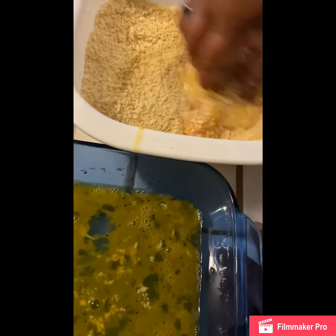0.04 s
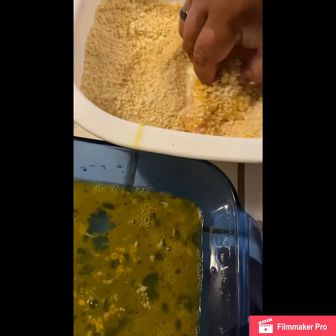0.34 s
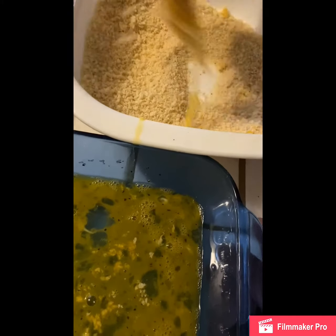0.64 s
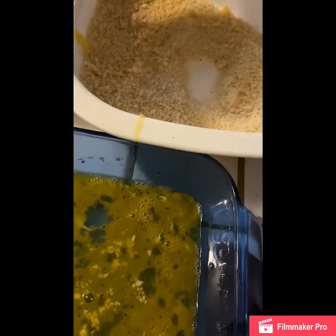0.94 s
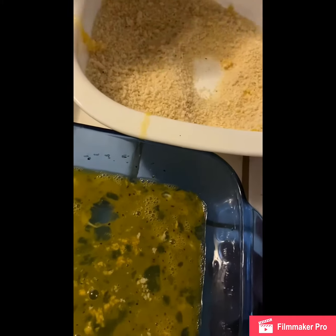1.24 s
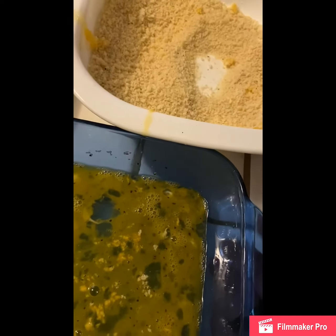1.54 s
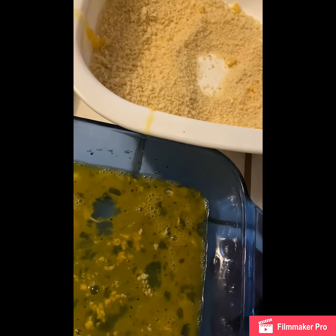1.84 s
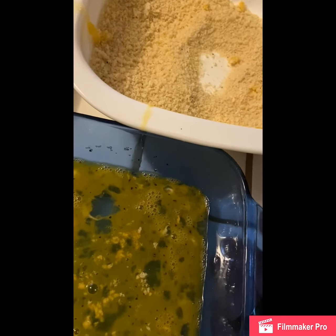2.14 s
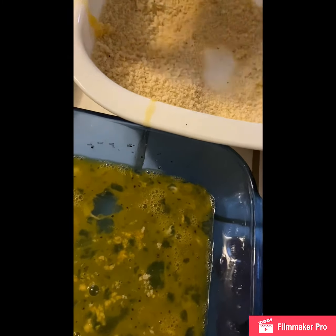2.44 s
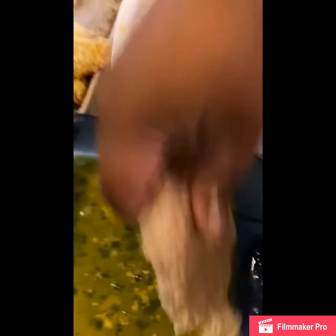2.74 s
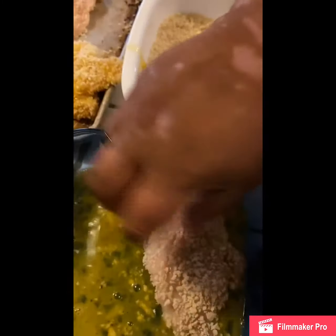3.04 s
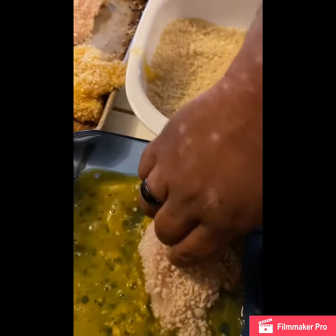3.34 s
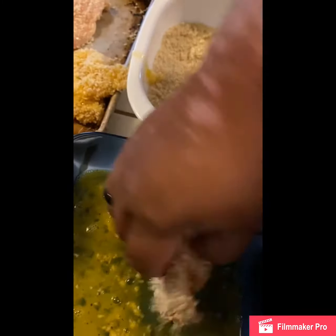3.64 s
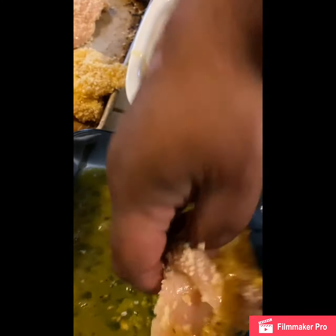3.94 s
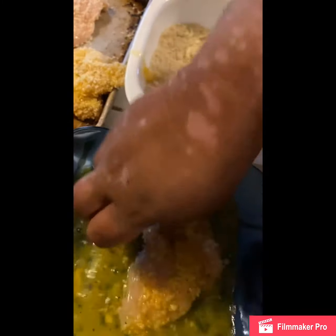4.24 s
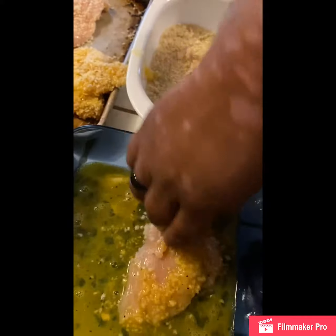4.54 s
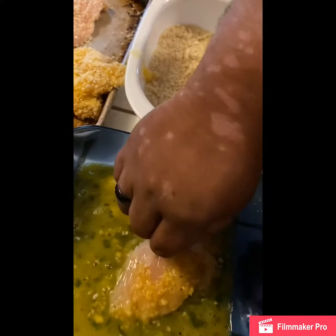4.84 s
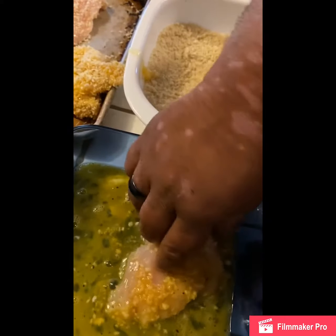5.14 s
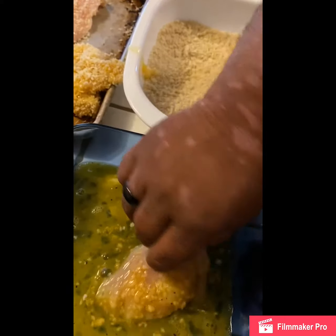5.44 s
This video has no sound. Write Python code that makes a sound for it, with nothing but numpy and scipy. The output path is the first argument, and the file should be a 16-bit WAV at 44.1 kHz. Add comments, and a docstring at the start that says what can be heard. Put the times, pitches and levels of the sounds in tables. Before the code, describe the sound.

Fingers rustle a raw cutlet through dry breadcrumbs, then slap it into beaten egg as the glass dish knocks on a tiled counter.

```python
"""A raw chicken cutlet is breaded by hand on a tiled kitchen counter, close to a phone.
Fingers press it into rustling dry crumbs in a plastic tub and flop it over with a wet slap,
then turn it in a glass dish of beaten egg, where tiny bubbles fizz and trapped air gulps out.
Each push tips the dish: it knocks on the tiles, chatters back and makes the counter hum briefly."""
import sys
import numpy as np
from scipy import signal
from scipy.fft import rfft, irfft, next_fast_len
from scipy.io import wavfile
from scipy.ndimage import map_coordinates

SR = 44100
rng = np.random.default_rng(int(sys.argv[2]) if len(sys.argv) > 2 else 0)


def file_out(sig):
    """Save sig as 16-bit WAV at sys.argv[1]."""
    # one column per channel
    cols = np.atleast_2d(sig).T
    # limit, then scale
    lim = np.clip(cols, -1, 1)
    pcm = np.round(lim * 32767).astype(np.int16)
    wavfile.write(sys.argv[1], SR, pcm)


N = 250047


def amp(db):
    """Turn decibels into a gain."""
    return 10 ** (np.asarray(db) / 20)


def unit(x):
    """Scale a sound to an average (rms) level of 1."""
    return x / np.sqrt(np.mean(x ** 2) + 1e-20)


def along(points, hz):
    """Read between (Hz, value) points on a log frequency scale."""
    freqs, values = np.transpose(points)
    return np.interp(np.log(hz + 1), np.log(freqs + 1), values)


def fade(t, fade_s):
    """A gain that dies away. All fade and rise times here span 60 dB."""
    return amp(-60 * t / fade_s)


def swell(start, hold_s, rise_s, fade_s):
    """A gain that rises to 1 by the start time, holds, then fades."""
    t = np.arange(N) / SR - start
    return fade(np.maximum(-t, 0), rise_s) * fade(np.maximum(t - hold_s, 0), fade_s)


def swells(rows, rise_s, fade_s):
    """Join several swells into one gain."""
    return np.linalg.norm([amp(db) * swell(s, hold, rise_s, fade_s) for s, hold, db in rows], axis=0)


def wobble(per_s):
    """A smooth curve through per_s random values a second."""
    return map_coordinates(rng.standard_normal(N // 20), [np.arange(N) * per_s / SR], mode="mirror")


def grains(per_s, spread_db):
    """Tiny random clicks of uneven size."""
    sizes = amp(spread_db * np.clip(rng.standard_normal(N), -2, 2)) * rng.choice([-1, 1], N)
    return unit(sizes * (rng.random(N) < per_s / SR))


def filtered(x, response):
    """Change each frequency's level and phase by response(hz)."""
    n = x.shape[-1]
    size = next_fast_len(n + 8192)
    return irfft(rfft(x, size) * response(np.fft.rfftfreq(size, 1 / SR)), size)[..., :n]


def coloured(x, tone):
    """Shape a sound with a (Hz, dB) table, without smearing it earlier in time."""
    size = 4096
    cepstrum = irfft(np.log(amp(along(tone, np.fft.rfftfreq(size, 1 / SR)))))
    cepstrum[1:size // 2] *= 2
    cepstrum[size // 2 + 1:] = 0
    return signal.fftconvolve(x, irfft(np.exp(rfft(cepstrum))))[:len(x)]


def add(track, start, sound, peak_db):
    """Mix a sound in at the given time and peak level."""
    part = track[max(round(start * SR), 0):][:len(sound)]
    part += (amp(peak_db) * sound / np.abs(sound).max())[:len(part)]


def softened(x, corner_hz):
    """A softer contact loses more treble."""
    return filtered(x, lambda hz: 1 / (1 + 1j * hz / corner_hz * np.sqrt(2) - (hz / corner_hz) ** 2))


def struck(blows, notes, crack_db):
    """Each blow cracks and rings an object's own notes; the shifting load detunes them a little."""
    out, t = np.zeros(N), np.arange(SR // 5) / SR
    for start, db, hardness_hz in blows:
        detune = 1 + 0.029 * rng.standard_normal(len(notes))
        ring = np.zeros(len(t))
        for k, (hz, note_db, fade_s) in enumerate(notes):
            level = amp(note_db + rng.normal(0, 1)) * fade(t, fade_s)
            ring += (-1) ** k * level * np.sin(2 * np.pi * hz * detune[k] * t)
        crack = amp(crack_db) * rng.standard_normal(len(t)) * fade(t, .015)
        onset = 1 - np.exp(-t / 0.000093)
        add(out, start, softened((ring + crack) * onset, hardness_hz), db)
    return out


# Level of the background noise, which dips briefly twice as the phone turns it down.
# Each row: time in seconds, relative level in dB.
NOISE_LEVELS = [(0, -63), (.4, -67), (1.1, -57), (1.4, -67.5), (1.6, -52), (2.3, -56), (3.1, -61),
                (3.65, -52), (3.9, -64), (4.2, -59), (5.67, -57.5)]
# Its tone. Each row, as in every _TONE table: frequency in Hz, relative level in dB.
NOISE_TONE = [(20, -28), (40, 2.5), (65, 0.5), (140, -2.5), (270, 0.5), (420, -12), (700, -14), (1200, -18),
              (2200, -22), (2750, -23), (3500, -28.5), (5000, -35), (16000, -42)]
def kitchen():
    """Low room noise, nearly the same at the phone's two microphones."""
    times, levels_db = np.transpose(NOISE_LEVELS)
    level = amp(np.interp(np.arange(N) / SR, times, levels_db) - 1.5)
    shared, apart = (unit(coloured(rng.standard_normal(N), NOISE_TONE)) for _ in range(2))
    return level * (shared + amp(-18) * apart * np.array([[1], [-1]]))


# The kitchen's echo. Each row: frequency in Hz, fade time in seconds.
ECHO_FADES = [(150, 0.36), (1000, 0.37), (4000, 0.13), (12000, 0.032)]
def room_echo(x):
    """The kitchen rings briefly; the two close microphones hear its bass alike, its treble apart."""
    hz, t, spectra = signal.stft(rng.standard_normal((2, SR // 2)), SR, nperseg=256)
    spectra *= fade(t, along(ECHO_FADES, hz)[:, None])
    spectra[1] *= np.clip(hz / 1400, 0, 1)[:, None]
    mid, side = signal.istft(spectra, SR, nperseg=256)[1]
    tail = np.array([mid + side, mid - side]) / np.linalg.norm(mid)
    return signal.fftconvolve(np.pad(x, (200, 0))[None], tail, axes=1)[:, :N]


# Echoes off the tub and dish walls. Each row: delay in seconds, left gain, right gain.
WALL_ECHOES = [(.00062, 0.034, 0.065), (.00112, 0.025, -0.12), (.0018, -0.072, 0.03), (.0029, 0.069, 0.007),
               (.0043, .05, .2), (.0066, 0.16, 0.072)]
def near_walls(x):
    """Near walls add faint, quick copies of the sound, different on each side."""
    return filtered(x, lambda hz: 1 + sum(np.outer([left, right], np.exp(-2j * np.pi * hz * delay))
                                          for delay, left, right in WALL_ECHOES))


# The hand leaning. Each row: start in seconds, hold in seconds, level in dB.
LEANS = [(2.14, 0.058, -51.5), (3.49, 0.013, -49.5), (4.57, 0.29, -54), (4.9, 0.046, -61),
         (5.15, 0.015, -46)]
RUMBLE_TONE = [(25, -19.5), (55, -5.5), (80, 1), (130, -10.5), (250, -41), (600, -74.5)]
def counter_rumble():
    """The counter rumbles faintly under the weight of the hand."""
    return swells(LEANS, rise_s=0.16, fade_s=0.76) * unit(coloured(rng.standard_normal(N), RUMBLE_TONE))


# The dish rocking. Each row: start in seconds, hold in seconds, relative level in dB.
ROCKING = [(3.17, 0.25, -52), (3.44, 0.065, -30), (3.58, 0.023, -32.5), (4.54, 0.041, -51.5),
           (4.71, .15, -35.5), (5.15, .025, -32.5), (5.32, 0.152, -34)]
def counter_hum(pitch_hz=261.8, waver_db=5):
    """The hollow counter's lowest note rings unsteadily while the dish rocks."""
    level = amp(-3.5) * swells(ROCKING, rise_s=0.069, fade_s=0.12)
    phase = 2 * np.pi * pitch_hz * np.arange(N) / SR + 0.3 * wobble(30)
    return level * unit(np.sin(phase) * amp(waver_db * wobble(40)))


# The dish dropping back. Each row: start in seconds, level in dB, fade in seconds, extra dB of boom.
DROPS = [(3.234, -35, 0.35, 0.5), (3.319, -38, 0.63, 1.5), (3.41, -24.5, 0.29, -1.5),
         (3.429, -26.5, 0.32, -1.5), (4.572, -50, 0.78, 9), (4.696, -26, 0.36, -8),
         (5.148, -33, 0.29, -2.5), (5.302, -24.5, 0.2, -12), (5.33, -33, 0.39, 0.5)]
CHATTER_TONE = [(50, -23), (150, -14.5), (250, -5), (370, -22), (520, 3), (690, 3.5), (900, 2.5),
                (1200, -7.5), (1600, -15), (2200, -19.5), (3200, -26), (5000, -32), (9000, -62.5)]
BOOM_TONE = [(40, -35.5), (90, -7.5), (120, -6), (155, 8), (185, -4), (250, 4.5), (320, -7.5), (380, -5),
             (500, -10), (900, -27.5), (3000, -73.5)]
def dish_settling():
    """The dish chatters to rest in quick small contacts that also make the counter boom."""
    out, chatter, boom = np.zeros((3, N))
    t = np.arange(SR // 2) / SR
    for start, db, fade_s, boom_db in DROPS:
        add(chatter, start, fade(t, fade_s), db)
        add(boom, start, fade(t, fade_s), db + boom_db)
    for force, tone in ((chatter, CHATTER_TONE), (boom, BOOM_TONE)):
        contacts = grains(per_s=900, spread_db=-0.5)
        out += coloured(contacts * force, tone) / np.std(coloured(contacts, tone))
    return out


# The dish hitting the tiles. Each row: start in seconds, peak in dB, hardness in Hz (higher is
# brighter), number of hits, gap in seconds, dB lost per bounce (below zero it grows).
DISH_HITS = [(3.161, -11, 1650, 2, .015, 15), (3.234, -10, 1700, 2, .023, 5),
             (3.316, -19.5, 800, 2, .042, -1.5), (3.415, -18, 800, 1, 0, 0),
             (3.432, -15, 863, 2, .012, -0.5), (3.4675, -10, 1055, 1, 0, 3), (4.519, -18.5, 1150, 1, 0, -2),
             (4.557, -14.5, 1388, 2, .012, 0), (4.647, -32.5, 1200, 1, 0, 0),
             (4.675, -17.5, 1180, 2, .022, 4), (5.137, -5.5, 2616, 2, .013, 0.5),
             (5.302, -23, 1760, 4, .027, 1.5)]
def dish_bounces():
    """The dish bounces at even gaps, duller each time: list each hit's start, peak and hardness."""
    return [(start + gap_s * k, db - loss_db * k, hardness_hz * 0.77 ** k)
            for start, db, hardness_hz, count, gap_s, loss_db in DISH_HITS for k in range(count)]


# The notes of the full dish. Each row: pitch in Hz, relative level in dB, fade in seconds.
DISH_NOTES = [(255, -17, 0.056), (594, -1.5, 0.013), (698.6, 6, 0.022), (807, 6, 0.009), (972, 0.5, 0.014),
              (1253, -8.5, 0.044), (1541, -13.5, 0.06), (1785, -22.5, 0.059), (2070, -13.5, 0.026),
              (2920, -20, 0.023), (2982, -16.5, 0.071), (3300, -24.5, 0.021), (3830, -26.5, 0.036),
              (4820, -39, .025)]
CLICK_TONE = [(1000, -13.5), (3000, -3), (4800, 0), (6500, -8), (9000, -21), (16000, -34.5)]
def dish_knocks():
    """Glass meets tile with a bright click; the egg quickly stops the dish ringing."""
    out, t = struck(dish_bounces(), DISH_NOTES, crack_db=-25.5), np.arange(SR // 25) / SR
    for start, db, _ in dish_bounces():
        click = rng.standard_normal(len(t)) * fade(t, 0.029)
        add(out, start, coloured(click, CLICK_TONE), db - 37.5)
    return out


# Shoves of hand and meat. Each row: start in seconds, length in seconds, first peak in dB.
SHOVES = [(1.486, .005, -39.5), (1.64, .056, -26), (1.717, .04, -24), (1.785, .04, -24), (1.86, .005, -24),
          (1.934, .005, -23.5), (1.972, .04, -24.5), (3.447, .04, -29)]
THUD_TONE = [(30, -12.5), (70, 0), (120, 10), (170, -4.5), (230, 4), (330, -8), (430, -30), (700, -60)]
def bumps(gap_s=0.019, jitter_s=.0028, loss_db_per_s=42):
    """A shove makes the tub or dish judder in dull thuds; each knock of the dish adds one more."""
    out, size = np.zeros(N), SR // 20
    thud = filtered(signal.unit_impulse(size, "mid"), lambda hz: amp(along(THUD_TONE, hz)))
    lead_s = size / 2 / SR  # the thud peaks halfway through
    for (start, length_s, db), slips in zip(SHOVES, rng.standard_normal((len(SHOVES), 16))):
        for after, slip in zip(np.arange(0, length_s, gap_s), slips):
            when = start + after + jitter_s * slip * (after > 0)
            add(out, when - lead_s, thud, db - loss_db_per_s * after)
    for start, db, _ in dish_bounces():
        add(out, start - lead_s, thud, db - 33.5)
    return out


# Presses that squeeze out egg. Each row: start in seconds, hold in seconds, relative level in dB.
EGG_PRESSES = [(3.38, 0.087, -62.5), (4.03, 0.15, -73.5), (4.66, 0.027, -67), (5.02, 0.014, -87),
               (5.36, 0.2, -72.5)]
FIZZ_TONE = [(500, -11.5), (1500, 5.5), (2700, 8), (4500, -4.5), (7000, -2.5), (11000, -11), (16000, -23)]
def egg_fizz():
    """Tiny bubbles and films of egg burst around the meat: a fine fizz with single crackles."""
    level = amp(7.5) * swells(EGG_PRESSES, rise_s=0.72, fade_s=0.47)
    fizz = unit(amp(2.3 * wobble(55)) * coloured(grains(per_s=2600, spread_db=5), FIZZ_TONE))
    crackle = unit(coloured(grains(per_s=120, spread_db=9), FIZZ_TONE))
    return level * (fizz + amp(-3) * crackle)


# Air under the sinking cutlet. Each row: start in seconds, peak in dB, starting pitch in Hz.
AIR_POCKETS = [(3.42, -23.5, 370), (3.459, -15, 368)]
def gulps(rise_hz_per_s=900):
    """A pocket of air rings briefly in the egg, its pitch rising as it escapes."""
    out, t = np.zeros(N), np.arange(SR // 8) / SR
    for start, db, hz in AIR_POCKETS:
        phase = 2 * np.pi * (hz + rise_hz_per_s * t / 2) * t
        add(out, start, np.sin(phase) * fade(t, 0.028), db)
    return out


# Blows on the tub. Each row: start in seconds, peak in dB, hardness in Hz.
TUB_HITS = [(.148, -42, 3000), (.797, -49, 1000), (.899, -44, 1800), (1.056, -38.5, 3000),
            (1.075, -44, 900), (1.148, -43, 800), (1.193, -44.5, 700), (1.478, -42.5, 700),
            (1.53, -41, 897), (1.734, -11, 3000), (1.785, -24, 1500), (1.965, -25.5, 1500)]
# The tub's notes. Each row: pitch in Hz, relative level in dB, fade in seconds.
TUB_NOTES = [(404, -10.5, 0.047), (714, -3, 0.031), (786, 0.5, 0.016), (1233, -0.5, 0.01),
             (1588, 2, 0.0086), (1834, 1.5, 0.026), (2590, -9.5, 0.028), (2940, 1, 0.011), (3584, -4, 0.01)]
def tub_taps():
    """Knuckles and meat strike the plastic tub, which rings briefly."""
    return struck(TUB_HITS, TUB_NOTES, crack_db=-9)


# Finger strokes. Each row: start, hold and fade in seconds, then relative rustle and grit levels in dB.
STROKES = [(0, 0.0017, .18, -39.5, -49.5), (0.059, 0.041, .22, -44, -54), (0.157, 0.016, 0.52, -52, -59),
           (0.293, 0.41, 0.25, -71.5, -72.5), (0.76, 0.28, .3, -62.5, -70),
           (0.96, 0.037, 0.34, -57.5, -56.5), (1.042, .03, 0.13, -48, -52.5),
           (1.055, 0.0062, 0.19, -44, -48.5), (1.116, 0.034, 0.58, -61.5, -72.5),
           (1.484, 0.16, 0.73, -60.5, -81), (1.764, 0.31, 0.77, -51, -59.5),
           (1.93, .04, 0.33, -52.5, -47.5), (2.124, 0.096, 0.075, -71, -59), (2.27, 0.48, 0.91, -75, -81.5),
           (2.737, 0.075, .15, -55.5, -58), (2.805, 0.013, 0.07, -48.5, -61.5)]
RUSTLE_TONE = [(150, 1.5), (400, -10.5), (850, -3), (1150, -4), (1750, -2.5), (2250, 1.5), (3000, 0),
               (4200, -4.5), (6000, -4), (9000, -11.5), (16000, -30)]
GRIT_TONE = [(1500, -13), (4000, 4), (6500, 6), (10000, 4.5), (13000, 1.5), (16000, -3)]
def crumbs(rise_s=0.027, clump_db=1):
    """Dry crumbs rub and crack in clumps: a coarse rustle that rings the tub, with fine grit on top."""
    strokes = [np.outer(amp([rustle_db, grit_db]), swell(start, hold_s, rise_s, fade_s))
               for start, hold_s, fade_s, rustle_db, grit_db in STROKES]
    rustle_level, grit_level = np.linalg.norm(strokes, axis=0)
    clumps = amp(clump_db * wobble(140))
    rubbing = coloured(grains(per_s=2200, spread_db=5), RUSTLE_TONE)
    # each tub note picks out a band 2.2 / fade_s Hz wide
    ringing = filtered(rubbing, lambda f: sum(amp(db) / (1 + 2j * (f - hz) * fade_s / 2.2)
                                              for hz, db, fade_s in TUB_NOTES))
    rustle = unit(clumps * (unit(rubbing) + amp(-8) * unit(ringing)))
    grit = unit(clumps * coloured(grains(per_s=2200, spread_db=5), GRIT_TONE))
    return rustle_level * rustle + amp(4.5) * grit_level * grit


# The clearest ticks. Each row: start in seconds, relative peak in dB, extra dB for the low part.
CLEAR_TICKS = [(.0548, -33, -25), (.18, -38, -25), (.7434, -33.5, -11), (.7492, -30, -14),
               (.7952, -35.5, 10.5), (.9083, -42, 2), (.9289, -33, -4), (1.055, -26, -2), (1.256, -47.5, 7),
               (1.5799, -43.5, -5.5), (2.4935, -46, 15), (2.5366, -44, 8), (2.5706, -41.5, 6),
               (2.6309, -47.5, -8), (2.7479, -33, -9.5), (2.8817, -45.5, -20.5), (4.038, -38.5, 10.5),
               (4.471, -43, 12), (4.655, -40, -21.5), (4.7725, -39.5, 19), (5.0212, -45.5, 11),
               (5.2023, -41, 28), (5.2832, -49, 17), (5.438, -44.5, 9), (5.462, -44.5, 7)]
# Hard crumbs hitting a rim. Each row: start in seconds, peak in dB, pitch in Hz.
RIM_PINGS = [(.750, -29.5, 3640), (2.564, -53.5, 3030), (2.57, -46, 3920)]
def ticks(stray_within_s=.1, stray_db=-54.5, stray_spread_db=2.5):
    """Crumbs land and sticky skin lets go: snaps, each with two faint strays nearby, and a few pings."""
    out, t = np.zeros(N), np.arange(SR // 25) / SR
    draws = rng.uniform(-1, 1, (len(CLEAR_TICKS), 2, 2))
    strays = [(abs(start + stray_within_s * when), stray_db + stray_spread_db * size, 0)
              for (start, _, _), pair in zip(CLEAR_TICKS, draws) for when, size in pair]
    onset = 1 - np.exp(-t / 0.00027)
    for start, db, low_db in CLEAR_TICKS + strays:
        snap = rng.standard_normal(len(t)) * fade(t, 0.02) * onset
        add(out, start, coloured(snap, GRIT_TONE) + amp(low_db) * coloured(snap, RUSTLE_TONE), db + 1.5)
    for start, db, hz in RIM_PINGS:
        add(out, start, np.sin(2 * np.pi * hz * t) * fade(t, .022), db)
    return out


# The cutlet's slaps. Each row: time in seconds, peak in dB, fade in seconds, brightness in Hz.
MEAT_SLAPS = [(1.735, -12.5, 0.022, 2830), (1.745, -26, .27, 1900), (1.768, -21, 0.016, 8700),
              (1.922, -29.5, .06, 2340), (1.963, -29, 0.13, 2450), (3.426, -15, .025, 5860),
              (3.466, -25.5, 0.014, 3000), (3.964, -25.5, .022, 12000), (3.973, -28.5, 0.0092, 5020),
              (4.065, -30.5, .05, 12100), (4.095, -40, 0.071, 6940), (4.484, -41.5, .036, 5200),
              (4.701, -36.5, 0.12, 4230), (5.04, -43.5, .024, 2480)]
MEAT_TONE = [(100, -11), (400, -22.5), (600, -4.5), (800, 6.5), (1200, -7.5), (1800, -3), (2300, -1),
             (3000, 0.5), (5000, -5.5), (10000, -9.5), (16000, -11)]
def cutlet_slaps(rise_s=.018):
    """Wet meat slaps down or peels loose in a quick spray of small contacts."""
    out, t = np.zeros(N), np.arange(SR // 5) / SR - rise_s
    for when, db, fade_s, bright_hz in MEAT_SLAPS:
        noise = rng.standard_normal(len(t))
        roughness_db = 3 * np.repeat(rng.standard_normal(len(t)), 32)[:len(t)]
        spray = noise * amp(roughness_db - 60 * np.maximum(t / fade_s, -t / rise_s))
        slap = filtered(coloured(spray, MEAT_TONE), lambda hz: 1 / (1 + 1j * hz / bright_hz))
        add(out, when - rise_s, slap, db)
    return out


# The two microphones' balance. Each row: frequency in Hz, left minus right level in dB.
MIC_BALANCE = [(60, -1.5), (110, -2.3), (200, -4.2), (330, -6), (500, -7), (750, -3.5), (1150, 1.8),
               (2380, -.5), (4200, -1), (8000, 0)]
# Their timing. Each row: frequency in Hz, how far left is ahead in radians.
MIC_PHASE = [(20, 0), (260, .1), (560, .75), (1000, .45), (2000, .15), (2900, 1), (5300, .35), (6550, 2.7),
             (8180, 3.6), (9730, 6.1), (11600, 6.7), (12600, 9.2), (14500, 9.7), (15600, 12.4)]
def scene():
    """Everything is within arm's reach of two microphones that differ in level and phase."""
    dish = dish_knocks() + dish_settling() + counter_hum()
    meat = cutlet_slaps() + gulps() + tub_taps()
    coating = crumbs() + egg_fizz() + ticks()
    echo = room_echo(amp(-17) * dish + amp(-12.5) * meat + amp(-15) * coating)
    mix = near_walls(dish + meat + coating) + bumps() + counter_rumble() + echo + kitchen()
    half = np.array([[.5], [-.5]])  # each side takes half the difference
    return filtered(mix, lambda hz: amp(half * along(MIC_BALANCE, hz))
                    * np.exp(1j * half * along(MIC_PHASE, hz)))


def record(dry, bass_hz=42, top_hz=16200):
    """The phone thins the deepest bass and cuts off the highest treble."""
    return filtered(dry, lambda hz: hz ** 2 / np.hypot(hz ** 2, bass_hz ** 2) * (hz < top_hz))


dry = scene()
out = record(dry)
file_out(out)
```